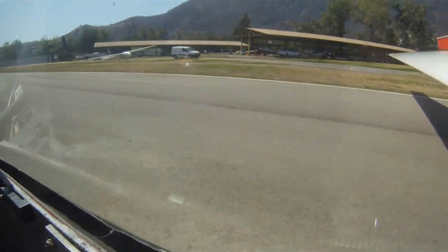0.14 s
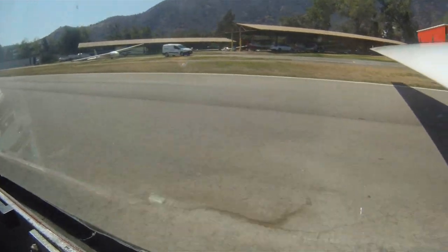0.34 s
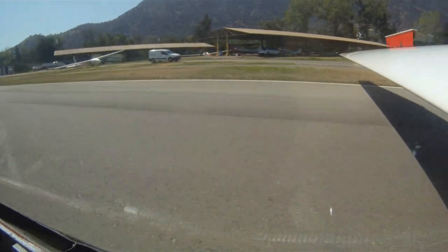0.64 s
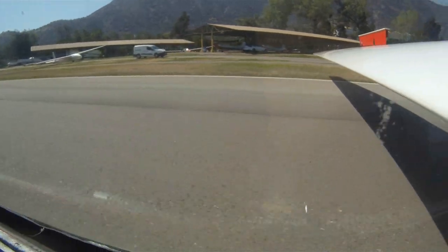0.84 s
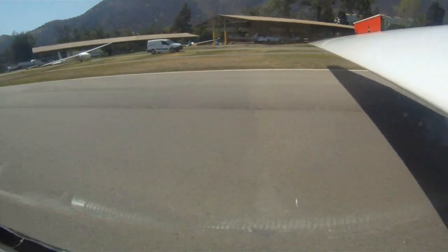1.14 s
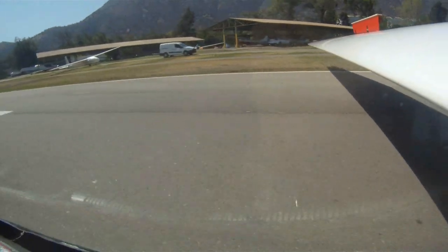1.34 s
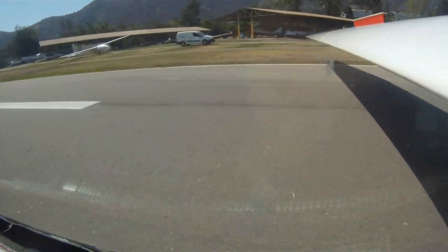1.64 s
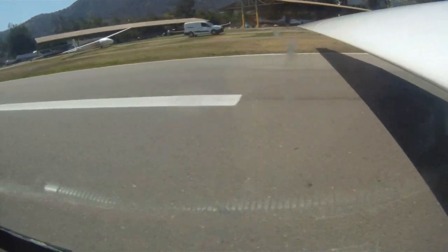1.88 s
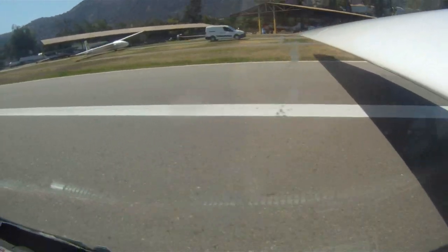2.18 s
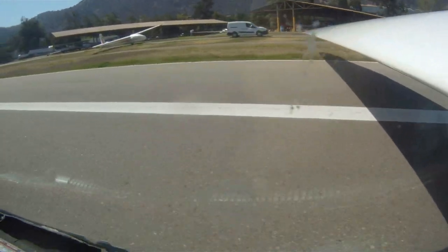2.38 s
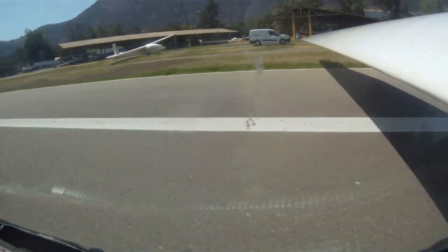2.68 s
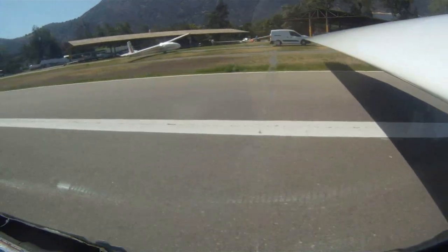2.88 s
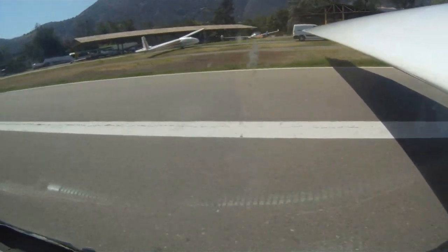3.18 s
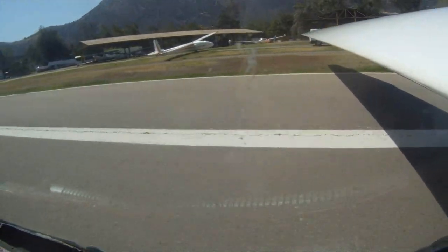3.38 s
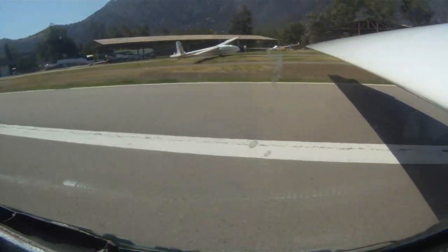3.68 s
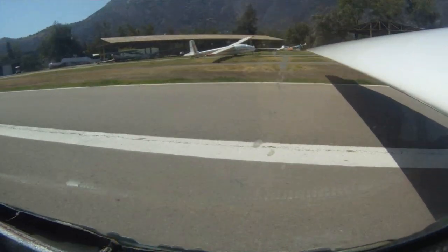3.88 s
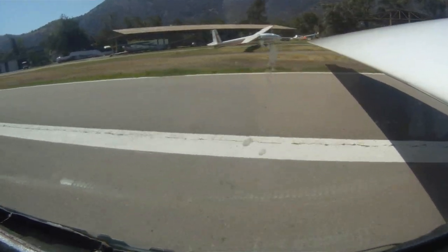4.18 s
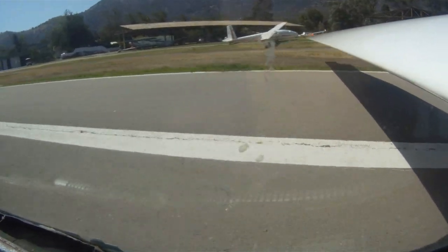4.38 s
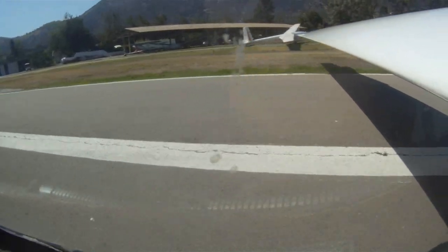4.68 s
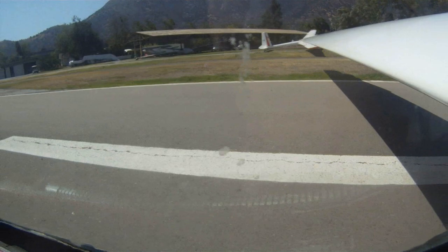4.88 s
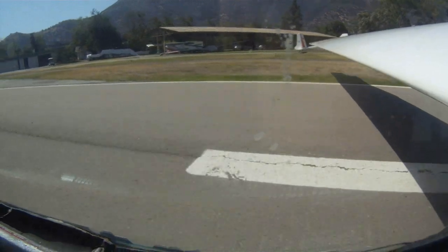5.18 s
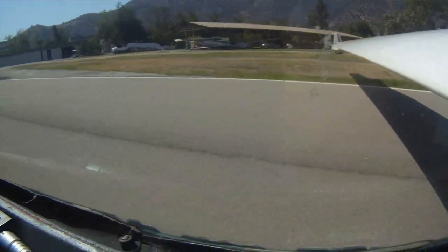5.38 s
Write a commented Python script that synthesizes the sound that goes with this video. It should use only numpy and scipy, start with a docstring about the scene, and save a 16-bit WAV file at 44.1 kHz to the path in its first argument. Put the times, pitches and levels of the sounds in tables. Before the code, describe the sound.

Muffled bass rumbling inside a rolling glider's hollow cabin, bumping over joints, with one sharp knock and a much harder bang before the middle.

```python
"""A low, uneven rumble is heard first: a glider rolls on its wheel along a paved runway, heard in its cockpit.
Noise for the rough paving shakes ringing modes of the hollow fuselage; joints and small bumps add thuds.
Loose fittings rattle and buzz as bursts of ringing noise, short taps make hard knocks near the camera,
and below lie a slow bounce on the tyre and a steady hiss. The small camera's recorder ducks after peaks, clips,
and holds each sample of a slow converter, which mirrors the bass into the treble."""
import sys
import numpy as np
from scipy import signal
from scipy.fft import rfft, irfft
from scipy.io import wavfile
from scipy.ndimage import uniform_filter1d, minimum_filter1d

SR = 44100
rng = np.random.default_rng(int(sys.argv[2]) if len(sys.argv) > 2 else 0)


def magnitude_from_level(level_db):
    """Linear magnitude for a level in decibels (20 dB per decade)."""
    exponent = np.asarray(level_db, float) / 20
    return 10 ** exponent


def int16_out(signal):
    """Quantize to a 16-bit WAV file."""
    q = np.round(np.clip(np.atleast_2d(signal).T, -1, 1) * 32767)
    wavfile.write(sys.argv[1], SR, q.astype(np.int16))


N = 243873  # length of the scene in samples

# How rough the paving runs: start_s [s], rumble_db [dB], buzz_db of the fittings [dB]
ROUGHNESS = [(0, -21.5, -59), (.2, -22.5, -60), (.7, -22, -59), (1.278, -19, -60.5), (1.6, -23, -60.5),
             (1.9, -18, -56.5), (2.249, -20.5, -61), (2.702, -21.5, -62), (3.098, -19.5, -57.5),
             (3.3, -21.5, -60), (3.68, -19.5, -60), (4, -18, -59.5), (4.4, -17.5, -59),
             (4.72, -20.5, -63.5), (4.8, -19.5, -59), (4.95, -19.5, -59), (5.1, -22, -63),
             (5.53, -17.5, -54.5)]
# Ringing modes of the fuselage shell and cabin air: pitch_hz [Hz], width_hz [Hz], level_db [dB, relative]
SHELL_MODES = [(79.9, 14, -3.5), (94.9, 18, -7), (129.3, 47, -10.5), (174.3, 30, -7), (203.8, 22, -2.5),
               (242, 28, -7), (318.7, 28, -6.5), (377, 18, -8), (426.3, 27, -9.5)]
# What the loose fittings ring with: pitch_hz [Hz], width_hz [Hz], level_db [dB, relative]
FITTING_MODES = [(1353, 260, -3.5), (1924, 164, 4), (2262, 160, 3.5), (2739, 226, 1.5), (3390, 440, -5),
                 (3982, 220, 1), (4088, 200, 2), (5340, 1500, -15)]
# The panel the fittings are fixed to: pitch_hz [Hz], width_hz [Hz], level_db [dB, relative]
PANEL_MODES = [(600, 160, -2), (770, 200, 0), (1050, 200, -3)]


def evened(x):
    """Scales a sound to an rms (average strength) of 1."""
    return x / np.sqrt(np.mean(x ** 2) + 1e-20)


def control(table, column):
    """Turns one dB column of a table into a smooth gain for every sample."""
    columns = np.transpose(table)
    return magnitude_from_level(np.interp(np.arange(N) / SR, columns[0], columns[column]))


def resonate(x, hz, width):
    """A two-pole resonance, gain 1 at its centre: the narrower it is, the longer it rings."""
    radius = np.exp(-np.pi * width / SR)
    turn = np.exp(2j * np.pi * hz / SR)
    return 2 * signal.lfilter([1 - radius], [1, -radius * turn], x).real


def ring(x, modes):
    """One push sets all modes ringing; neighbouring modes swing in opposite sense."""
    total = 0
    for k, (hz, width, db) in enumerate(modes):
        total = total + (-1) ** k * magnitude_from_level(db) * resonate(x, hz, width)
    return total


def muffle(x, hz=440):
    """The closed camera housing shuts out all but the bass."""
    return signal.sosfilt(signal.butter(N=6, Wn=hz, fs=SR, output="sos"), x)


def lumps(per_s, spread_db, t60):
    """An envelope of random bumps that start at once and fall by 60 dB in t60 seconds."""
    size = magnitude_from_level(spread_db * np.minimum(rng.exponential(1, N), 4))
    starts = size * (rng.random(N) < per_s / SR)
    return evened(signal.lfilter([1], [1, -magnitude_from_level(-60 / t60 / SR)], starts))


def blow(ms):
    """A short smooth push followed by silence."""
    return np.pad(np.hanning(round(ms * SR / 1000)), (0, SR // 4))


def add(mix, s, db, sound):
    """Adds a sound into the mix at s seconds, with its peak at db."""
    part = mix[round(s * SR):][:len(sound)]
    part += magnitude_from_level(db) * sound[:len(part)] / abs(sound).max()


def rumble():
    """Uneven paving shakes the shell modes and the strongest cabin boom."""
    surge_db = 1.3
    boom_hz, boom_width_hz, boom_db = 280.2, 33, 0.7
    deep_start_db, deep_fade_db_per_s = 1.93, -0.8
    road = rng.standard_normal((len(SHELL_MODES), N))  # each mode feels its own share of the wheel force
    surge = uniform_filter1d(rng.standard_normal(N), SR // 16)
    surge = evened(uniform_filter1d(surge, SR // 16))
    road *= magnitude_from_level(surge_db * surge)  # lumpy paving makes the shell modes surge together
    # the two deepest modes calm down as the glider slows
    road[:2] *= magnitude_from_level(deep_start_db + deep_fade_db_per_s * np.arange(N) / SR)
    shell = resonate(rng.standard_normal(N), boom_hz, boom_width_hz) * magnitude_from_level(boom_db)
    for force, (hz, width, db) in zip(road, SHELL_MODES):
        shell += magnitude_from_level(db) * resonate(force, hz, width)
    return control(ROUGHNESS, column=1) * evened(muffle(shell))


def thud(hz):
    """A jolt swells and dies within a few cycles on the sprung wheel, and leaves the shell ringing."""
    push = blow(2.52)
    wheel = push
    for _ in range(3):
        wheel = resonate(wheel, hz, 260)
    return muffle(wheel + magnitude_from_level(-4.5) * ring(push, SHELL_MODES), 480)


def jolts():
    """Joints in the paving jolt the wheel hard, small bumps jolt it lightly all the way."""
    # The hardest jolts, most on joints in the paving, with the wheel jolting again just after the biggest one:
    # start_s [s], peak_db [dB], pitch_hz of the thud [Hz]
    joints = [(0.357, -8, 296), (0.522, -6.5, 230), (.723, -6.5, 229), (.896, -13, 259), (0.97, -8.5, 205),
              (1.465, -11.5, 253), (1.561, -9.5, 301), (1.747, -9, 283), (1.905, -4.5, 370),
              (1.975, -9, 315), (1.985, -6, 265), (1.994, -4, 252.5), (2.3084, -2.5, 303.7),
              (2.3126, 6.5, 298.7), (2.329, 2.5, 250), (2.346, -5, 240), (3.113, -8, 294),
              (3.223, -8.5, 254), (5.038, -8.5, 259)]
    bumps_per_s, bumps_db = 32, -34.5
    size = magnitude_from_level(2.7 * np.minimum(rng.exponential(1, N), 3)) * rng.choice([-1, 1], N)
    hits = size * (rng.random(N) < bumps_per_s / SR)
    bumps = signal.oaconvolve(hits, thud(280))[:N]
    out = magnitude_from_level(bumps_db) * evened(bumps)
    for s, db, hz in joints:
        add(out, s, db, thud(hz))
    return out


def knocks():
    """A sharp tap rings a loose part near the camera, the panel behind it and the fittings."""
    # Hard knocks: start_s [s], peak_db [dB], panel_db and fittings_db [dB relative to peak_db]
    hard_knocks = [(0.9556, -15.5, -8, -22), (1.9071, -38, 11, -2.5), (2.3127, -19.5, -14.5, 1),
                   (2.3158, -14.5, -16, 4.5), (2.3182, -15, -8, 2.5)]
    # What the knocked part rings with: pitch_hz [Hz], width_hz [Hz], level_db [dB, relative]
    knocked_modes = [(1420, 210, -10), (1730, 120, 1), (2380, 450, 0.5), (2970, 490, -7),
                     (4580, 650, -32.5), (5540, 720, -20)]
    out = np.zeros(N)
    tap = blow(0.2)
    for s, db, panel_db, fittings_db in hard_knocks:
        add(out, s, db, ring(tap, knocked_modes))
        add(out, s, db + panel_db, ring(tap, PANEL_MODES))
        add(out, s, db + fittings_db, ring(np.gradient(tap), FITTING_MODES))  # the slope is brighter
    return out


def fittings():
    """Loose parts chatter in dying bursts when shaken, and buzz in small random bursts all the time."""
    # The clearest rattles: start_s [s], level_db at the strongest point of the burst envelope [dB]
    clear_rattles = [(0.1141, -53), (0.2008, -54), (0.3116, -43), (0.329, -55.5), (0.3611, -51.5),
                     (0.372, -49.5), (0.409, -50.5), (0.4294, -57), (0.5038, -50.5), (0.527, -50),
                     (0.6914, -54), (0.7147, -53), (0.865, -47.5), (0.9533, -43), (1.0366, -49.5),
                     (1.1667, -43.5), (1.2184, -53), (1.233, -38), (1.242, -53), (1.2952, -47),
                     (1.4473, -40.5), (1.5325, -47.5), (1.7126, -52), (1.9017, -46.5), (1.951, -46),
                     (1.9604, -37), (1.969, -40.5), (1.984, -44), (2.085, -49), (2.1743, -53),
                     (2.2879, -46), (2.3115, -30), (2.322, -30), (2.55, -58.5), (2.606, -59.5),
                     (2.649, -51.5), (2.666, -51), (2.698, -52), (2.7195, -47.5), (2.77, -44), (2.791, -54),
                     (2.853, -57.5), (2.8782, -48), (2.987, -58.5), (3.006, -50.5), (3.026, -46),
                     (3.1037, -52.5), (3.3827, -50), (3.468, -51), (3.5105, -54), (3.593, -46),
                     (3.7143, -54.5), (4.0768, -50), (4.1625, -52), (4.29, -49), (4.6087, -51),
                     (4.6763, -53), (4.7588, -61.5), (4.888, -56.5), (5.027, -58), (5.2594, -46.5),
                     (5.316, -53), (5.4433, -46.5)]
    rise_s, t60_s = 0.00049, 0.072
    panel_db = 2  # how much of a rattle the panel takes up
    t = np.arange(SR // 2) / SR
    burst = magnitude_from_level(-60 * t / t60_s) * (1 - np.exp(-t / rise_s))
    bursts = np.zeros(N)
    for s, db in clear_rattles:
        add(bursts, s, db, burst)
    buzz = control(ROUGHNESS, column=2) * evened(3.0 + lumps(82, 1.8, 0.045))
    grit = 1.6 + lumps(400, 2.5, 0.008)  # many tiny taps over a steady noise
    taps = rng.standard_normal((2, N)) * grit
    ringing = evened(ring(taps[0], FITTING_MODES)) * (bursts + buzz)
    panel = magnitude_from_level(panel_db) * evened(ring(taps[1], PANEL_MODES)) * bursts
    return ringing + panel


def tyre_bounce():
    """The glider bounces on its springy tyre: very low resonant noise, with one long swell near the start."""
    # How strong the bounce is: start_s [s], level_db [dB]
    bounce_levels = [(0, -34), (.35, -34), (.6, -47), (.9, -34), (2.2, -34.5), (3.2, -44), (4.7, -37),
                     (5.1, -43.5), (5.53, -33.5)]
    bounce_hz = 34
    swell_start_s, swell_length_s, swell_db = 0.02, 0.34, -22
    sway = resonate(rng.standard_normal(N), bounce_hz, 9)
    sway = resonate(sway, bounce_hz, 20)
    out = control(bounce_levels, column=1) * evened(sway)
    t = np.arange(0, swell_length_s, 1 / SR)
    swell = np.sin(np.pi * t / swell_length_s) * np.sin(2 * np.pi * bounce_hz * t)
    add(out, swell_start_s, swell_db, swell)
    return out


def tyre_hiss():
    """Steady tyre noise, coloured by its way through the shell."""
    # Colour of the hiss: pitch_hz [Hz], level_db [dB per Hz, relative]
    hiss_colour = [(300, -34.5), (500, -24), (620, 1), (760, 6), (900, -4), (1150, -9), (1400, -20),
                   (3000, -26.5), (5000, -30), (6000, -56.5)]
    hiss_db = -51
    hz, db = np.transpose(hiss_colour)
    bins_hz = np.fft.rfftfreq(N, 1 / SR)
    colour = magnitude_from_level(np.interp(np.log(bins_hz + 1), np.log(hz), db))
    noise = rng.standard_normal(N)
    return magnitude_from_level(hiss_db) * evened(irfft(rfft(noise) * colour, N))


def scene():
    """All sources together, on one channel."""
    mix = rumble() + jolts() + knocks() + fittings() + tyre_bounce() + tyre_hiss()
    return mix[None]


def gain_control(x):
    """Ducks after peaks, holds a moment, then recovers steadily."""
    threshold_db, duck_per_db = -13.0, 0.78
    hold_s, lag_s, recovery_db_per_s = 0.047, 0.0055, 80.0
    step_db = 0.57
    peak_db = 20 * np.log10(abs(x) + 1e-9)
    wait = round(hold_s * SR)
    # the highest peak of the last moments
    peak_db = -minimum_filter1d(-np.pad(peak_db, (wait // 2, 0), "edge"), wait)[:N]
    fall = np.arange(N) * recovery_db_per_s / SR
    falling_peak_db = np.maximum.accumulate(peak_db + fall) - fall
    over_db = np.maximum(falling_peak_db - threshold_db, 0)
    lag = np.exp(-1 / (lag_s * SR))  # the duck arrives a few ms late
    duck_db = duck_per_db * signal.lfilter([1 - lag], [1, -lag], over_db)
    stepped_db = step_db * np.round(duck_db / step_db)  # small gain steps, each a faint tick
    return x / magnitude_from_level(stepped_db)


def slow_converter(x):
    """Holding each sample of a slow converter mirrors the bass into the treble."""
    hold = 4  # 48000 Hz / 4 = 12000 samples a second
    smooth = signal.sosfilt(signal.butter(N=6, Wn=5200, fs=SR, output="sos"), x)
    slow = signal.resample_poly(smooth, 160, 147)[::hold]  # 160 / 147 turns 44100 Hz into 48000 Hz
    held = signal.resample_poly(np.repeat(slow, hold), 147, 160)
    return signal.sosfilt(signal.butter(N=12, Wn=15100, fs=SR, output="sos"), held)


def band_limit(x):
    """A steep low-pass at the top of the band."""
    return signal.sosfilt(signal.butter(12, 16330, fs=SR, output="sos"), x)


def record(dry):
    """The recorder: gain control, then clipping, then the slow converter."""
    clipped = np.clip(gain_control(dry[0]), -0.5, 0.5)
    converted = slow_converter(clipped)
    mix = np.pad(converted, (0, 8))[None, :N]
    return band_limit(mix)


dry = scene()
out = record(dry)
int16_out(out)
```